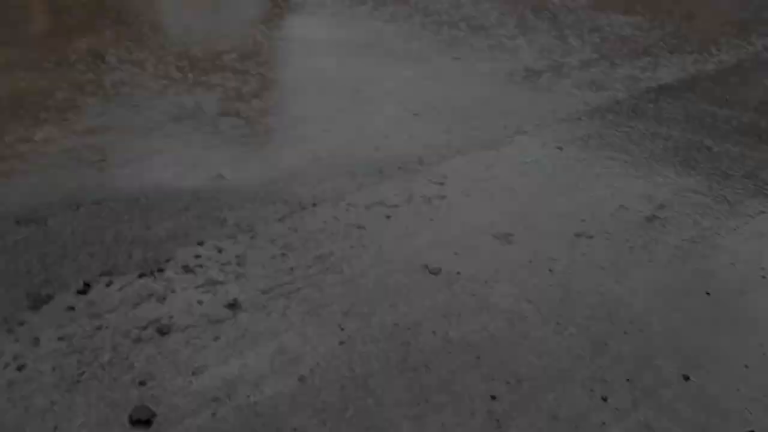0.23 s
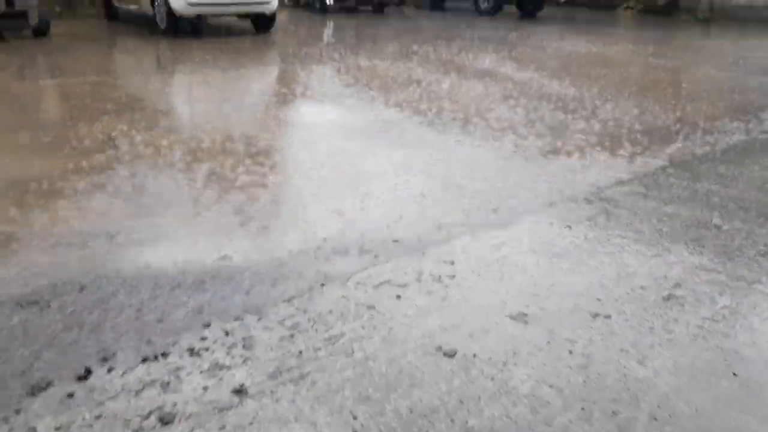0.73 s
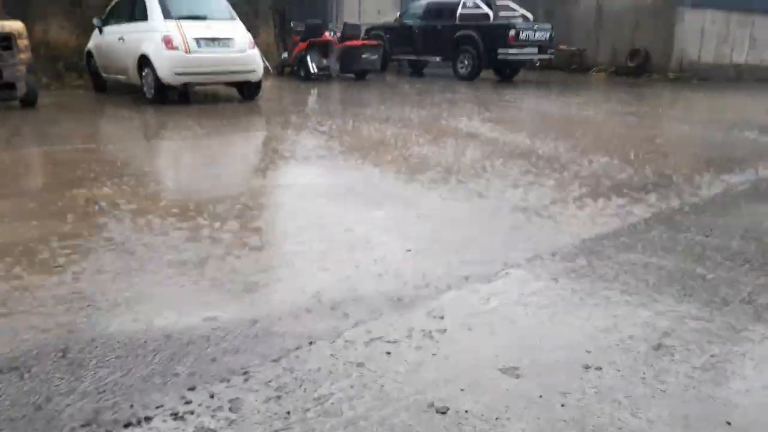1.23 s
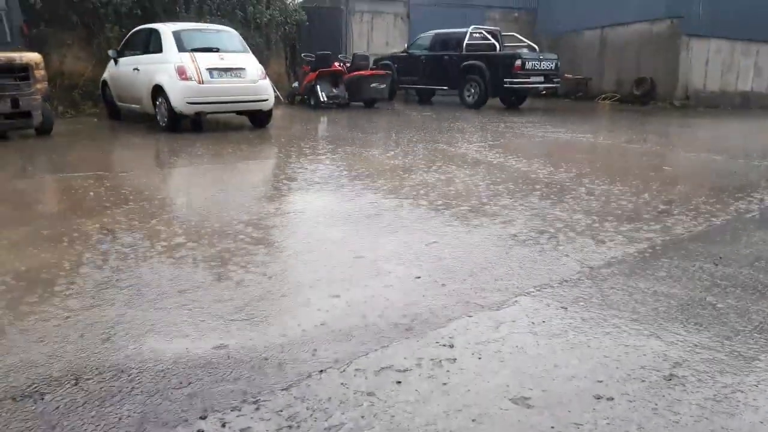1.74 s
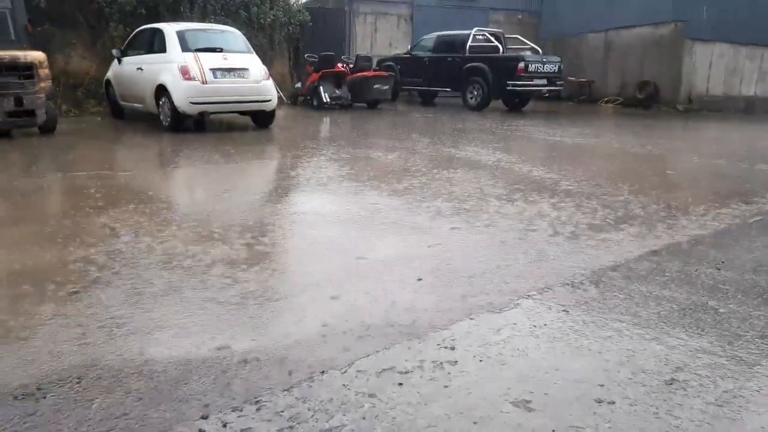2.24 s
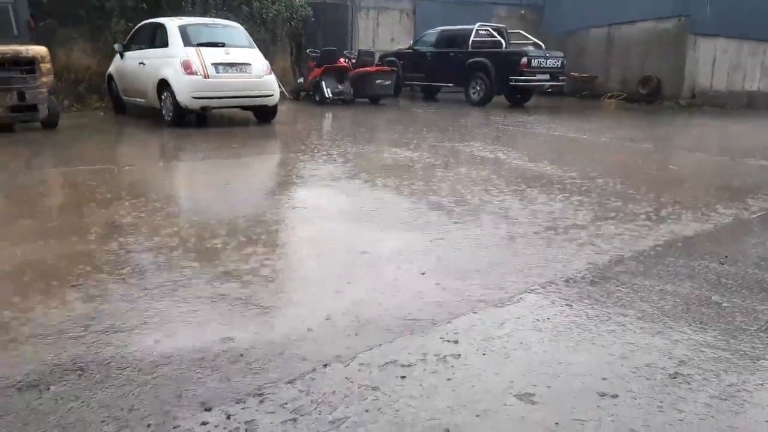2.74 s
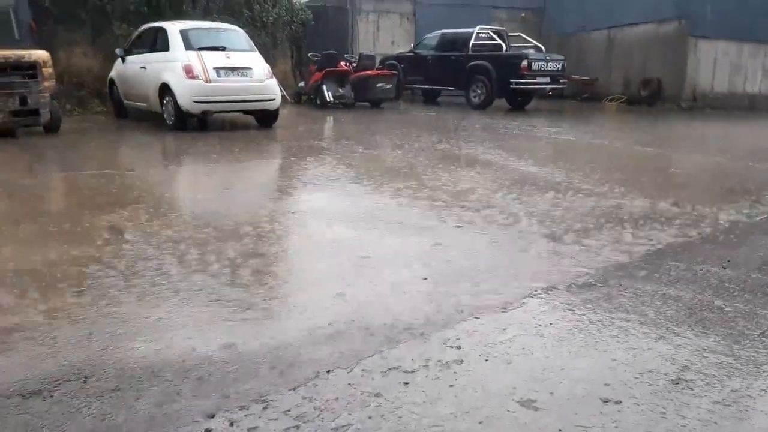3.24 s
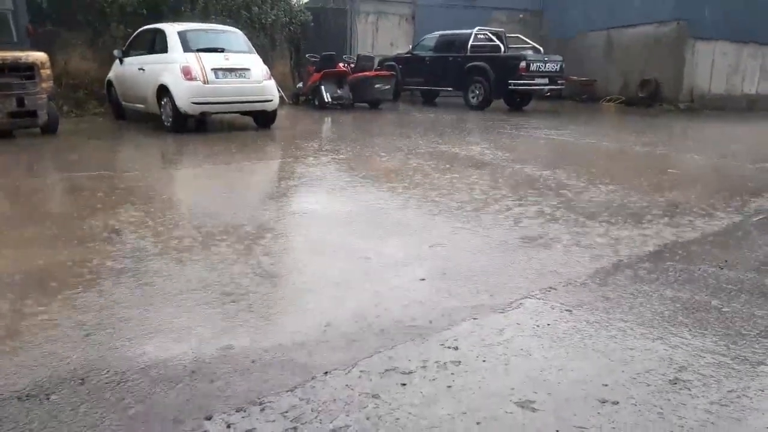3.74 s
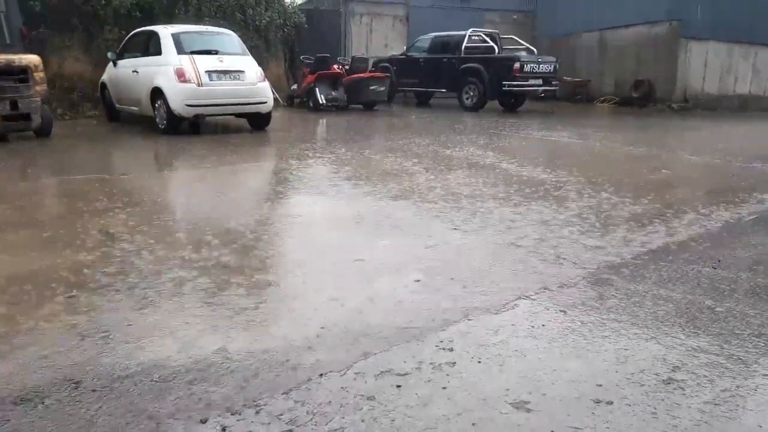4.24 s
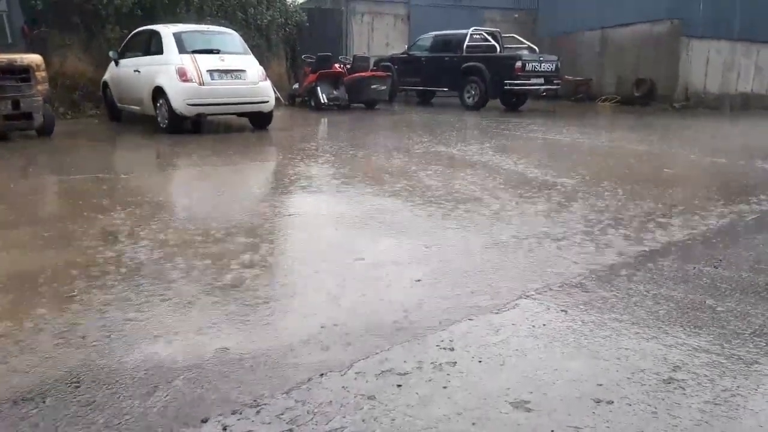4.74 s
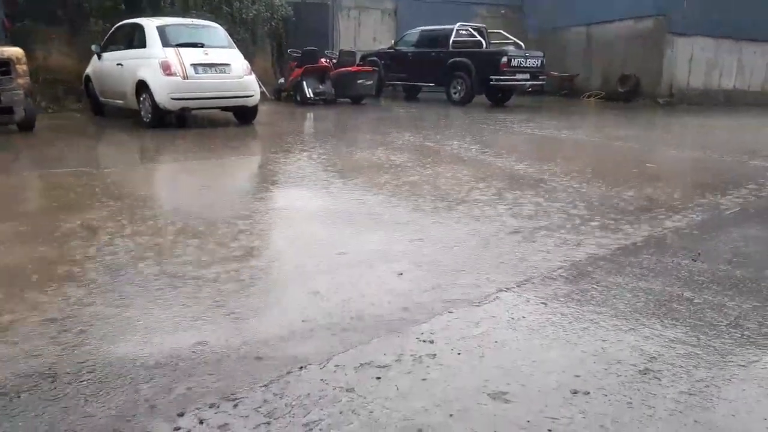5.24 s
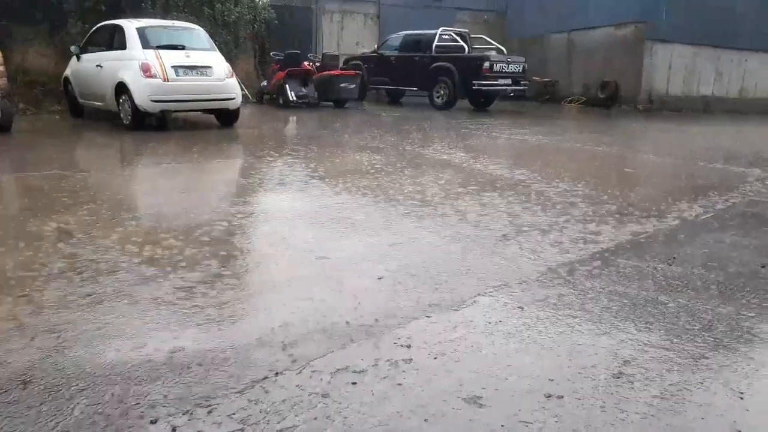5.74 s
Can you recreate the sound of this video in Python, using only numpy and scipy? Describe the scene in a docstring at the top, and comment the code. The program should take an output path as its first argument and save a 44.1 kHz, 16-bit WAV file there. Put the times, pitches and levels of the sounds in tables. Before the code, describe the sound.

Steady rain on a flooded concrete yard. It cuts in quietly and swells within half a second to an even hiss, with dense dull plips in puddles and finer bright ticks on concrete. Scattered heavy drops snap right beside the microphone, each with a tiny spray and quick hard-wall echo. The ticking softens gradually, and a fade begins just before the end.

```python
"""Steady rain on a puddled concrete yard: noise for the wash of far drops, random hits for the patter of
nearer ones, and a tick, a short spray and wall echoes for each close drop. It cuts in quietly and swells
over half a second. A brief flurry comes at 2.2 s. Over the first 4.6 s the ticks on the concrete weaken
as the microphone lifts away. A fade starts at 5.8 s and is unfinished at the end. Mono, on two channels."""
import sys
import numpy as np
from scipy import signal
from scipy.fft import rfft, irfft
from scipy.io import wavfile
from scipy.ndimage import uniform_filter1d

SR = 44100
rng = np.random.default_rng(int(sys.argv[2]) if len(sys.argv) > 2 else 0)


def generate_wav(signal):
    """Clip the signal to [-1, 1] and save it as 16-bit WAV at the path in sys.argv[1]."""
    frames = np.transpose(np.atleast_2d(signal))
    scaled = np.clip(frames, -1, 1) * 32767
    pcm = np.round(scaled).astype(np.int16)
    wavfile.write(sys.argv[1], SR, pcm)


N = 264644


def amp(db):
    """dB to amplitude factor."""
    return 10 ** (np.asarray(db) / 20)


def unit_energy(x):
    """Scales to an energy of 1."""
    return x / np.sqrt(np.sum(x ** 2) + 1e-20)


def unit_rms(x):
    """Scales to an rms of 1."""
    return x / np.sqrt(np.mean(x ** 2) + 1e-20)


def read_spectrum(points, hz):
    """Joins (Hz, dB) points by straight lines on a log-frequency axis."""
    point_hz, db = np.transpose(points)
    return np.interp(np.log(hz + 1), np.log(point_hz + 1), db)


def add(mix, start_s, sound):
    """Mixes a sound in at start_s, cut at the end of the mix."""
    part = mix[round(start_s * SR):][:len(sound)]
    part += sound[:len(part)]


def minimum_phase(gain, size=1024):
    """The most sudden impulse response with the spectrum gain(hz): phase from the log gain."""
    hz = abs(np.fft.fftfreq(size, 1 / SR))
    log_gain = np.log(np.maximum(gain(hz), 1e-4))
    spectrum = np.exp(np.conj(signal.hilbert(log_gain)))
    return np.fft.ifft(spectrum).real[:size // 2]


def close_drops(level_db=-0.47):
    """The heavy drops that land next to the microphone, at set times; the last one is built of three parts."""
    # Loudest close drops; the last has a low body, a bright tick and a strong wall echo in separate rows.
    # Each row: start in seconds, level in dB before level_db, centre of the tick in Hz,
    # its half-width in octaves, spray in dB against the tick.
    drop_rows = [(.6827, -2, 13000, 1.1, -6), (.7999, 1.5, 6300, 0.63, -5), (.8437, 7.5, 10000, 1.2, -5.5),
                 (1.1988, -0.5, 14500, .9, -5), (1.3509, 2, 4700, 1.4, -3), (1.4344, -0.5, 6700, 0.7, -7),
                 (2.0539, -4, 8200, 0.55, -4), (2.2316, -4, 10200, .35, -7), (3.2465, .5, 15500, .7, -7),
                 (3.4294, -3.5, 7700, 1, -10), (3.706, -5, 10300, .45, -3), (4.223, -3.5, 6500, 0.59, -4),
                 (4.3474, 3.5, 15500, 0.52, -3), (4.388, 3, 4200, 0.76, -7), (4.6327, -1.5, 6900, .8, -4),
                 (4.8825, 2, 10600, 0.93, 0.5), (5.757, -3, 2300, 0.61, 4), (5.7577, 4, 8500, 0.34, 2),
                 (5.78, -1.5, 6300, 1, -10)]
    out = np.zeros(N)
    for start_s, db, centre_hz, octaves, spray_db in drop_rows:
        add(out, start_s, close_drop(db + level_db, centre_hz, octaves, spray_db))
    return out


def light_drops(per_s=3.5, level_db=-10.5, scatter_db=2.5, low_hz=8500, high_hz=16000, octaves=0.75, spray_db=-7):
    """Lighter drops land just as close, at random moments and with random size and colour."""
    out = np.zeros(N)
    for when, size, colour in rng.random((round(per_s * N / SR), 3)):
        centre_hz = low_hz * (high_hz / low_hz) ** colour
        db = level_db + scatter_db * (2 * size - 1)
        add(out, when * N / SR, close_drop(db, centre_hz, octaves, spray_db))
    return out


def close_drop(db, centre_hz, octaves, spray_db):
    """A drop next to the microphone, or a part of one: its splash and the echoes."""
    one_hit = signal.unit_impulse(SR // 10)
    sound = unit_energy(splash(one_hit, centre_hz, octaves, spray_db))
    tick_and_spray = np.hypot(1, amp(spray_db))  # more spray, more total energy
    return amp(db) * tick_and_spray * yard(sound)


def splash(hits, centre_hz, octaves, spray_db, spray_t60_s=0.13, burst_db=-5, burst_t60_s=0.004):
    """Each hit makes a tick, a burst as the drop breaks up, then a dying spray of droplets."""
    power = np.zeros(len(hits))
    for db, t60_s in [(burst_db, burst_t60_s), (spray_db, spray_t60_s)]:
        keep = amp(-120 / (t60_s * SR))  # acts on power: 60 dB down after t60_s
        power += amp(db) ** 2 * signal.lfilter([1 - keep], [1, -keep], hits ** 2)
    droplets = np.sqrt(power) * unit_rms(rng.laplace(size=len(hits)))

    def tick_gain(hz):
        distance_octaves = np.log2((hz + 1) / centre_hz)
        return 1 / (1 + (distance_octaves / octaves) ** 2)

    tick = unit_energy(minimum_phase(tick_gain))
    return signal.oaconvolve(hits + droplets, tick)[:len(hits)]


def yard(x, spread=0.055):
    """Hard surfaces throw a tick back; the paths differ a little with the place where the drop lands."""
    # Echoes of a surface close by and of a wall. Each row: nominal delay in seconds, level in dB.
    echoes = [(.0023, -8.5), (0.022, -14)]
    out = x.copy()
    for delay_s, db in echoes:
        path = 1 + spread * (2 * rng.random() - 1)
        add(out, delay_s * path, amp(db) * x)
    return out


def patter(level_db, per_s, low_hz, high_hz, octaves, spread_db, spray_db, count=12):
    """Drops at middle distance, of many colours; most are faint and a few are stronger."""
    out = np.zeros(N)
    for centre_hz in np.geomspace(low_hz, high_hz, count):
        sizes = amp(spread_db * np.minimum(rng.exponential(1, N), 3))
        hits = sizes * (rng.random(N) < per_s / count / SR)
        out += splash(hits, centre_hz, octaves, spray_db)
    return amp(level_db) * unit_rms(out)


def far_rain(level_db=-29.0, patchy_db=0.64, flicker_db=-0.04):
    """Merged far drops: noise with small drifting patches and a flicker shared by all pitches."""
    # Spectrum of the far wash. Each row: frequency in Hz, relative density in dB per Hz.
    wash = [(30, -34), (52, -24.5), (74, -13), (115, -10), (200, -10), (270, -5), (345, -8.5), (810, -3),
            (910, 0.86), (1850, -3), (2900, -0.84), (4600, -6.5), (6500, -10), (16000, -16.5)]
    frames, bins = N // 128 + 20, 512 // 2 + 1  # a hop of 128 samples
    real, imag, patches = rng.standard_normal((3, bins, frames))
    patches = uniform_filter1d(patches, size=12, axis=1)
    patches = unit_rms(uniform_filter1d(patches, size=10, axis=0))
    flicker = unit_rms(uniform_filter1d(rng.standard_normal(frames), size=5))
    grid = (real + 1j * imag) * amp(patchy_db * patches + flicker_db * flicker)
    noise = signal.istft(grid, nperseg=512, noverlap=384)[1][:N]
    colour = amp(read_spectrum(wash, np.fft.rfftfreq(N, 1 / SR)))
    return amp(level_db) * unit_rms(irfft(rfft(noise) * colour, N))


def scene():
    """Wash, dull plops in puddles and bright ticks on concrete follow the rain; close drops are added."""
    # Strength of the rain. Each row: time in seconds, level in dB.
    strength = [(.6, 1.4), (1.3, -0.6), (2.3, 0.43), (4.1, 0), (5.7, -0.17)]
    flurry_at_s, flurry_s, flurry_db = 2.17, 0.033, 0.9  # flurry_s: half-length
    concrete_near_db, lift_s = 4, 4.6  # extra ticks while the microphone points down; time to lift
    t = np.arange(N) / SR
    strength_db = np.interp(t, *np.transpose(strength))
    strength_db += flurry_db * np.exp(-((t - flurry_at_s) / flurry_s) ** 2)
    pointing_down = .5 + .5 * np.cos(np.pi * np.minimum(t / lift_s, 1))
    puddles = patter(level_db=-38.0, per_s=420, low_hz=1390, high_hz=3720, octaves=0.37, spread_db=2.0, spray_db=-6)
    concrete = patter(level_db=-44, per_s=200, low_hz=6130, high_hz=15000, octaves=0.71, spread_db=3, spray_db=3.5)
    concrete *= amp(concrete_near_db * pointing_down)
    rain = (far_rain() + puddles + concrete) * amp(strength_db)
    return np.tile(rain + close_drops() + light_drops(), (2, 1))


def record(dry):
    """Microphone colour, the fades (straight in amplitude) and the band limit."""
    # Small microphone: resonance of its port and the dip above it. Each row: frequency in Hz, gain in dB.
    mic_response = [(6500, 0), (8000, 2.5), (8950, 7), (9450, 2.5), (10100, -7.5), (11800, -4.5),
                    (13500, -7), (15600, -7)]
    fade_in_at_s, fade_from_db, fade_in_s = .069, -28.5, 0.51
    fade_out_at_s, fade_out_s, edge_hz = 5.776, 0.48, 15850
    t = np.arange(N) / SR
    swell = np.minimum(amp(fade_from_db) + (t - fade_in_at_s) / fade_in_s, 1)
    fade_in = (t >= fade_in_at_s) * swell
    fade_out = np.clip(1 - (t - fade_out_at_s) / fade_out_s, 0, 1)
    mic = minimum_phase(lambda hz: amp(read_spectrum(mic_response, hz)))
    heard = signal.oaconvolve(dry, mic[None])[:, :N] * fade_in * fade_out
    band_limit = signal.firwin(511, edge_hz, window=("kaiser", 8), fs=SR)
    return signal.oaconvolve(heard, band_limit[None], "same")


dry = scene()
out = record(dry)
generate_wav(out)
```